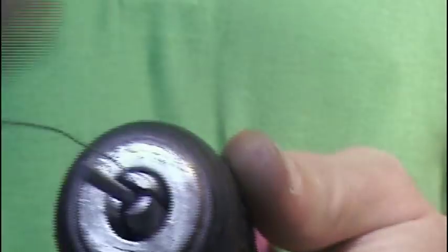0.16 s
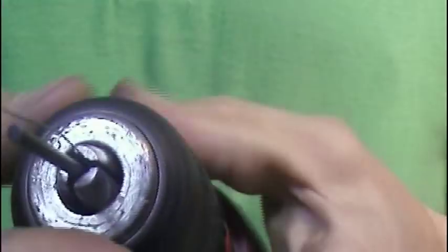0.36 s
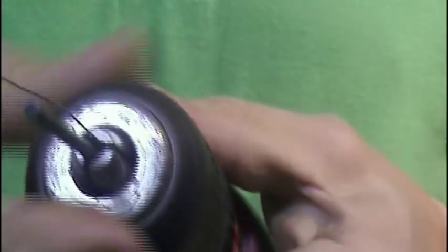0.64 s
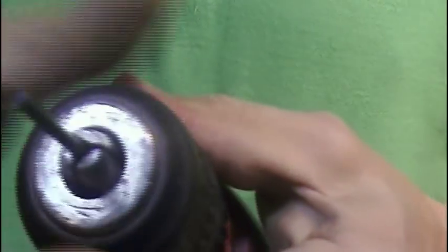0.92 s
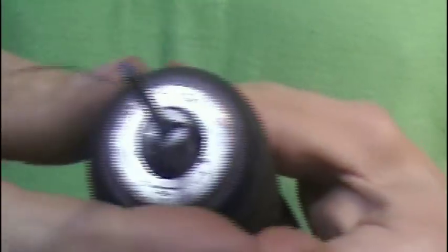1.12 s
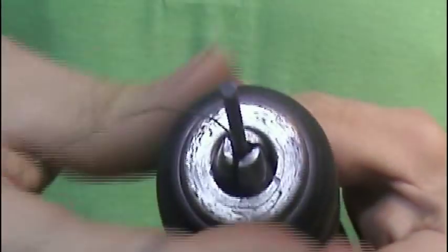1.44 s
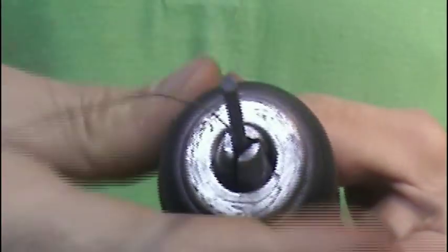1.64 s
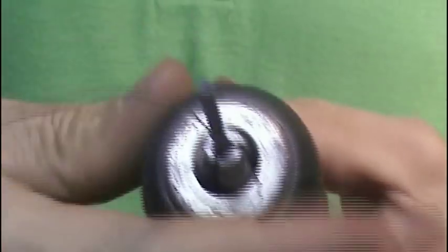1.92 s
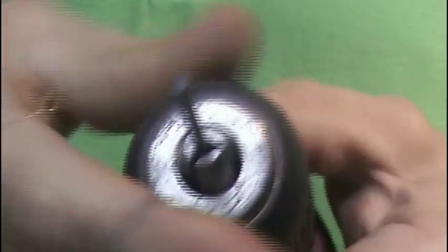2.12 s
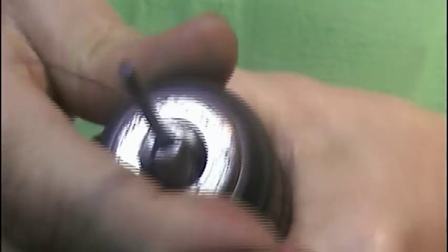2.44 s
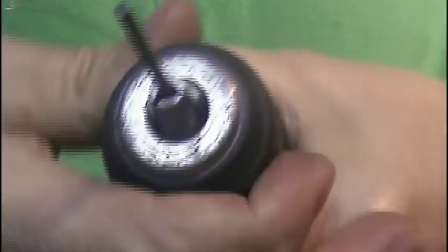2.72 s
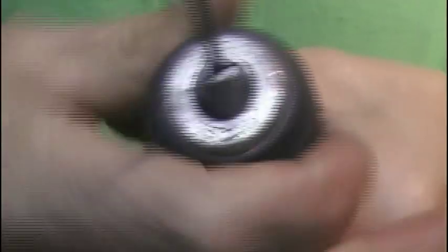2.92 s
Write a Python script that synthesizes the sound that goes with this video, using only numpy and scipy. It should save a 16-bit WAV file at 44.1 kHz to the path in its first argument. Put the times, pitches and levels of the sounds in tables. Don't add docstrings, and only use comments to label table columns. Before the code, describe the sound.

Hand-turned drill chuck rattles and clicks in uneven bursts, with brief scraping over faint rumble and hiss

```python
import sys
import numpy as np
from scipy import signal
from scipy.fft import rfft, irfft, next_fast_len
from scipy.io import wavfile
from scipy.ndimage import uniform_filter1d, map_coordinates

SR = 44100
rng = np.random.default_rng(int(sys.argv[2]) if len(sys.argv) > 2 else 0)


def wav_out(sig):
    wavfile.write(sys.argv[1], SR, np.round(np.clip(np.atleast_2d(sig).T, -1, 1) * 32767).astype(np.int16))


def nominal_scale(level):
    x = np.asarray(level, float) / 20
    return 10 ** x


N = 136710

# frequency in Hz, density in dB per Hz.
FLOOR_COLOUR = [(12, -37), (20, 3.5), (60, -2.5), (150, -11), (574, -21.5), (4540, -29.5), (6910, -29.5),
                (12500, -39), (15500, -72)]
# frequency in Hz, likeness from 0 to 1.
FLOOR_LIKENESS = [(40, 0.4), (3000, 0.17)]
# frequency in Hz, left over right in dB.
FLOOR_LEAN = [(30, 3.5), (300, .3)]
# centre in Hz, width in Hz, level in dB.
SLEEVE_MODES = [(237, 980, -15.5), (876, 405, -2), (1440, 546, -0.9), (2100, 464, 0.5), (3195, 715, -2),
                (4404, 1665, -7), (7800, 2400, -15.5), (9650, 2000, -17.5)]
# frequency in Hz, gain in dB.
RADIATION = [(100, -7.5), (400, 4.5), (900, 0.83), (5000, -3), (6500, -5), (12000, -5), (14500, -16),
             (16200, -66)]
# start in seconds, peak in dB, main ring in Hz, length in ms, brightness in dB per octave.
KNOCK_EVENTS = [(.2218, 0.5, 4530, 5.24, 4.5), (0.4328, -19, 2020, 4.4, 1), (0.442, -14, 1420, 7.9, 3.5),
                (0.6616, -4.5, 1220, 2.7, -1.5), (0.672, -10, 1250, 6.8, 2.2), (0.693, -12.5, 1510, 4.9, 1),
                (0.812, -10.5, 1090, 4.4, 1), (0.877, -12.5, 1440, 7.4, 0.7),
                (0.893, -11.5, 2360, 9.4, 0.2), (0.9065, -16, 1285, 4.5, 3), (0.952, -17.5, 1170, 7.6, -2),
                (2.153, -11.5, 1120, 2.43, -2), (2.599, -14, 1040, 4.33, 1.8),
                (2.8102, -7, 2360, 2.8, -1.1)]
# start in seconds, peak in dB, main ring in Hz.
TICK_EVENTS = [(1.5, -16.5, 2500), (.2218, -7.5, 4800), (.5006, -20.5, 1200), (.6856, -20, 1100),
               (2.0483, -7.5, 3450), (1.007, -34.5, 920), (1.318, -29.5, 1930), (1.683, -18.5, 1330),
               (1.881, -25, 1050), (1.897, -22, 1810), (2.16, -23, 1480), (2.576, -22, 2000),
               (2.84, -31, 1580)]
# start in seconds, peak in dB, mode in Hz, length in ms.
PING_EVENTS = [(0.2224, -8.5, 1334, 6.1), (0.2223, -9.5, 2140, 2.4), (0.443, -21.5, 4370, 3.5),
               (.478, -18.5, 3980, 1.6), (0.4883, -24, 4160, 2.5), (0.6626, -25, 3460, 3),
               (.673, -22, 3180, 4), (0.6927, -20.5, 4470, 2.4), (.693, -26, 10400, 2),
               (0.7214, -18, 4430, 3), (0.8123, -18.5, 4880, 6.6), (.8122, -19.5, 10200, 4.7),
               (0.8122, -12, 2100, 5), (.9105, -16.5, 3260, 3), (.924, -21.5, 4320, 4),
               (1.266, -29.5, 3520, 3.4), (1.292, -23, 3400, 3), (1.361, -26, 10000, 2.5),
               (1.524, -24, 2720, 1.65), (1.7372, -12.5, 3630, 3), (1.7585, -14, 3300, 2),
               (1.773, -18, 3530, 2.9), (0.877, -14.5, 2590, 2.7), (1.767, -12, 2080, 5.4),
               (0.222, -4.5, 4410, 2.7), (1.982, -21, 3260, 3.5), (2.634, -31.5, 10700, 3),
               (2.7103, -24.5, 3000, 3), (2.745, -28, 2770, 2.5), (2.764, -34, 2900, 5),
               (2.769, -27.5, 3250, 4), (2.811, -14, 4250, 1.7), (2.0487, -10.5, 3430, 3),
               (2.978, -41, 3400, 3)]
# frequency in Hz, time to fall 60 dB in seconds.
ROOM_DECAY = [(500, 0.16), (3500, 0.2), (10000, 0.086)]
# start in seconds, length in seconds, level in dB, brightness in dB per octave.
SCRAPE_EVENTS = [(0.229, 0.029, -33, 1), (0.324, 0.14, -57, 6.5), (0.431, 0.071, -35, 0.5),
                 (0.618, 0.013, -37.5, -2), (0.666, 0.075, -46.5, 7.5), (0.824, 0.1, -39, 0.5),
                 (2.499, 0.064, -46.5, 2), (1.046, 0.041, -53.5, -6.5), (1.225, 0.017, -42, -2.5),
                 (1.315, 0.045, -64, 14), (1.414, 0.026, -32.5, 2.5), (1.469, 0.066, -41.5, -2.5),
                 (1.563, 0.022, -47.5, 6.5), (1.745, 0.058, -36, 3), (1.885, 0.033, -36.5, -0.5),
                 (2.01, 0.062, -33.5, 0), (2.066, 0.017, -28.5, 1), (2.234, 0.174, -48, 1.5),
                 (2.402, 0.018, -26, -0.5), (2.433, 0.06, -33, 0.6), (2.597, 0.067, -46, -1.3),
                 (2.752, 0.052, -49.5, 6.5), (2.809, 0.028, -38.5, 1.8), (2.896, 0.042, -45, -3),
                 (2.961, 0.036, -45.5, 2), (3.043, 0.029, -46, -1.5)]
# start in seconds, peak in dB, main ring in Hz, length in ms.
CLICK_EVENTS = [(0.385, -29, 2160, 4.7), (0.414, -28, 1930, 5.3), (0.456, -19, 1420, 7.3),
                (0.47, -17.5, 1480, 7.1), (0.4775, -17.5, 1440, 7), (0.4867, -18, 1470, 4.2),
                (0.6467, -20.5, 1980, 4), (0.679, -16, 1060, 9.1), (0.711, -17, 1090, 5),
                (0.7563, -18.5, 1900, 3.9), (0.8193, -12, 1020, 6), (0.914, -15.5, 1450, 3.75),
                (0.922, -15.5, 1410, 8.5), (1.157, -28, 1400, 2.1), (1.263, -17.5, 1430, 5.6),
                (1.289, -17.5, 1330, 6.3), (1.523, -19.5, 1746, 5.2), (1.669, -24, 850, 4.6),
                (1.697, -22.5, 1410, 2.4), (1.79, -15.5, 1470, 3.5), (1.865, -24.5, 1070, 2.3),
                (1.98, -20, 1560, 6.8), (2.244, -21, 1020, 5.3), (2.581, -14.5, 2070, 3.6),
                (2.634, -18, 1460, 3.7), (2.7105, -21.5, 1530, 4.8), (2.745, -34, 2760, 3.3),
                (2.762, -34, 3300, 4.9), (2.977, -19.5, 970, 2.1), (2.999, -17, 940, 4.4)]
# start in seconds, peak in dB, main ring in Hz, length in ms, brightness in dB per octave.
CATCH_EVENTS = [(.509, -18.5, 2580, 9.8, 3), (1.2766, -29, 1500, 5, 0), (1.343, -40, 1400, 4.6, -2),
                (1.351, -33, 930, 2.7, -8), (1.367, -26, 1400, 3.6, -3.5), (1.4168, -25, 5100, 15, 2.5),
                (1.4365, -24.5, 1500, 5, -4), (1.4425, -32, 1800, 3.6, -7), (1.506, -34, 1730, 14, -2),
                (1.655, -28, 1320, 2.4, -14), (1.753, -16.5, 2000, 7.2, -7.5), (1.8495, -25.5, 1410, 2, 4),
                (2.216, -30, 960, 4.2, -4), (2.4065, -19.5, 3430, 19, 1.5), (2.439, -15.5, 1500, 11.6, -2),
                (2.467, -17.5, 2450, 22, 1), (2.814, -21, 1100, 13, 5)]
# time of peak in seconds, peak in dB, main ring in Hz, length in ms, brightness in dB per octave.
JOLT_EVENTS = [
    (.513, -16, 2100, 10.3, 1),
    (0.7217, -14, 1920, 6.1, 3),
    (0.7491, -15, 900, 6.1, -4),
    (1.361, -14.5, 1280, 6.1, -3),
    (1.5997, -9.5, 1900, 5, 0.5),
    (1.738, -9.5, 1440, 6, 2.5),
    (1.7585, -8.5, 1430, 5, 1.5),
    (1.771, -10, 1560, 9.1, 2.5),
    (2.0484, -8.5, 1400, 7, -0.5),
    (2.4299, -1, 1430, 5.2, 5),
]
# start in seconds, peak in dB, thump in Hz.
PUSH_EVENTS = [
    (.67, -35.5, 177),
    (1.74, -33, 149),
    (2.243, -39, 70),
    (2.404, -39, 200),
]
# frequency in Hz, side under mid in dB.
PORT_SPREAD = [(1500, -27), (4500, -16), (11000, -8)]


def unit(x):
    return x / np.sqrt(np.mean(x ** 2) + 1e-20)


def along(points, hz):
    f, v = np.transpose(points)
    return np.interp(np.log(hz + 1), np.log(f + 1), v)


def causal(gain):
    cepstrum = irfft(np.log(np.maximum(gain, 1e-6)))
    half = cepstrum.shape[-1] // 2
    folded = [cepstrum[..., :1], 2 * cepstrum[..., 1:half], 0 * cepstrum[..., half:]]
    return np.exp(rfft(np.concatenate(folded, -1)))


def peak(f, hz, width_hz):
    return 1j * f * width_hz / (hz * hz - f * f + 1j * f * width_hz)


def place(rows, times):
    out = np.zeros(N + rows.shape[1])
    for row, s in zip(rows, times):
        out[round(s * SR):][:len(row)] += row
    return out[:N]


def floor():
    m = next_fast_len(N)
    f = np.fft.rfftfreq(m, 1 / SR)
    angle = np.arccos(np.clip(along(FLOOR_LIKENESS, f), -1, 1)) / 2
    noise = rfft(rng.standard_normal((2, m))) * nominal_scale(along(FLOOR_COLOUR, f))
    shared, apart = noise * [np.cos(angle), np.sin(angle)]
    lean = nominal_scale(along(FLOOR_LEAN, f) / 2)
    pair = irfft([(shared + apart) * lean, (shared - apart) / lean], m)[:, :N]
    return nominal_scale(-47.5) * unit(pair)


def sleeve(f, tilt_db, chance):
    scatter_db, detune = 1.5, 0.04
    modes = []
    for k, (hz, width_hz, db) in enumerate(SLEEVE_MODES):
        gain = (-1) ** k * nominal_scale(db + scatter_db * chance[:, k, :1])
        modes.append(gain * peak(f, hz * (1 + detune * chance[:, k, 1:]), width_hz))
    tilt = tilt_db[:, None] * np.log2((f + 900) / 2700)
    return sum(modes[:-2]), sum(modes[-2:]), causal(nominal_scale(along(RADIATION, f) + tilt))


def even(force):
    z = rfft(force)
    power = uniform_filter1d(np.abs(z) ** 2, size=18, axis=1)
    return z * causal(1 / np.sqrt(np.abs(power) + 1e-6))


def rattles(s, db, hz, ms, tilt_db, top=0, lone_q=None):
    contacts_per_ms, contact_db, lead_gain = 3.174, 3, 1.014
    gather_db, fade_db, bright_fade_db = 30, 10.5, 4
    ring_db, ring_q = 8, 4.5
    size = 2048
    f, t_ms = np.fft.rfftfreq(size, 1 / SR), np.arange(size) * 1000 / SR
    draw = rng.random((len(s), 3, size))
    age = t_ms / ms[:, None] - top

    hit = np.clip((contacts_per_ms * 1000 / SR - draw[:, 0]) * 200, 0, 1)
    lead = np.abs(age) == np.abs(age).min(1, keepdims=True)
    hit = hit + lead_gain * lead
    strength_db = -contact_db * np.log(draw[:, 2] + 0.027)
    envelope_db = np.where(age < 0, gather_db, -fade_db) * age
    force = hit * np.sign(draw[:, 1] - 0.5) * nominal_scale(strength_db + envelope_db)
    force = force * np.clip(4 * (1 - top - age), 0, 1)

    body, steel, colour = sleeve(f, tilt_db, rng.standard_normal((len(s), len(SLEEVE_MODES), 2)))
    hz = hz[:, None]
    if lone_q:
        sound = even(force) * peak(f, hz, hz / lone_q) ** 2
    else:
        ring = 1 + nominal_scale(ring_db) * peak(f, hz, hz / ring_q)
        bright_force = force * nominal_scale(-bright_fade_db * np.abs(age))
        sound = even(force) * body * ring + even(bright_force) * steel
    rows = irfft(sound * colour)
    rows = rows * np.clip(2 - 2 * np.arange(size) / size, 0, 1) ** 2
    rows = rows / np.abs(rows).max(1, keepdims=True) * nominal_scale(db)[:, None]
    return place(rows, s - top * ms / 1000)


def knocks():
    return rattles(*np.transpose(KNOCK_EVENTS))


def ticks():
    s, db, hz = np.transpose(TICK_EVENTS)
    return rattles(s, db, hz, 3.3 + 0 * s, 0.1 + 0 * s)


def pings():
    s, db, hz, ms = np.transpose(PING_EVENTS)
    return rattles(s, db, hz, ms, 0 * s, lone_q=4.53)


def room(x):
    out, step = np.zeros((2, N + SR)), SR // 5
    delay = 130
    angle = np.arccos(0.99) / 2
    for i in range(0, N, step):
        hz, t, z = signal.stft(rng.standard_normal((2, SR // 3)), SR, nperseg=256)
        decay = nominal_scale(-60 * t / along(ROOM_DECAY, hz)[:, None])
        a, b = signal.istft(z * decay, SR, nperseg=256)[1]
        shared, apart = np.cos(angle) * a, np.sin(angle) * b
        tail = np.array([shared + apart, shared - apart]) / np.linalg.norm(a)
        wet = signal.fftconvolve(x[None, i:i + step], tail, axes=1)
        out[:, i + delay:][:, :wet.shape[1]] += wet
    return out[:, :N]


def scrapes():
    rise_s, fall_s, sag_db = 0.004, 0.013, 1
    grains_per_s, grain_db, smooth_db = 1480, 4.5, -4
    clumps_per_s, clump_db = 90, 4
    s, length, db, tilt_db = np.transpose(SCRAPE_EVENTS)
    size = 16384
    f, t = np.fft.rfftfreq(size, 1 / SR), np.arange(size) / SR
    draw = rng.random((len(s), 2, size))
    noise = rng.standard_normal((len(s), size))
    grains = np.clip((grains_per_s / SR - draw[:, 0]) * 200, 0, 1) * np.sign(noise)
    grains = grains * nominal_scale(-grain_db * np.log(draw[:, 1] + 0.016))
    chance = 0.5 * rng.standard_normal((len(s), len(SLEEVE_MODES), 2))
    body, steel, colour = sleeve(f, tilt_db, chance)
    rows = irfft(rfft(unit(grains) + nominal_scale(smooth_db) * noise) * (body + steel) * colour)

    stroke = 1 - np.exp(-t / rise_s)
    stroke = stroke * np.exp(-np.maximum(t - length[:, None], 0) / fall_s)
    knots = rng.standard_normal((len(s), size * clumps_per_s // SR + 2))
    clumps = np.array([np.interp(t * clumps_per_s, np.arange(len(k)), k) for k in knots])
    stroke = stroke * nominal_scale(clump_db * clumps)
    level = nominal_scale(db[:, None] - sag_db * t / length[:, None])
    return place(rows / rows.std(1, keepdims=True) * stroke * level, s)


def clicks():
    s, db, hz, ms = np.transpose(CLICK_EVENTS)
    return rattles(s, db, hz, ms, -0.81 + 0 * s)


def catches():
    return rattles(*np.transpose(CATCH_EVENTS))


def jolts():
    return rattles(*np.transpose(JOLT_EVENTS), top=0.45)


def pushes():
    s, db, hz = np.transpose(PUSH_EVENTS)
    return rattles(s, db, hz, 6 + 0 * s, 0 * s, lone_q=1.53)


def ports(x):
    m = next_fast_len(N + 8192)
    f = np.fft.rfftfreq(m, 1 / SR)
    turn = map_coordinates(rng.standard_normal((2, 400)), [[0 * f, 0 * f + 1], [f / SR * 700] * 2])
    response = nominal_scale(along(PORT_SPREAD, f)) * (turn[0] + 1j * turn[1]) / np.sqrt(2)
    side = irfft(rfft(x, m) * response, m)[:N]
    return np.array([x + side, x - side])


def scene():
    main = knocks() + ticks() + scrapes() + clicks() + jolts()
    details = pings() + catches() + pushes()
    return ports(main + details) + nominal_scale(-15) * room(main + 0.5 * details) + floor()


def roll_off(x):
    return signal.sosfilt(signal.butter(12, 16180, fs=SR, output="sos"), x)


def record(dry):
    ceiling, knee = 1.02, 8
    clipped = dry / (1 + np.abs(dry / ceiling) ** knee) ** (1 / knee)
    return roll_off(clipped)


dry = scene()
out = record(dry)
wav_out(out)
```